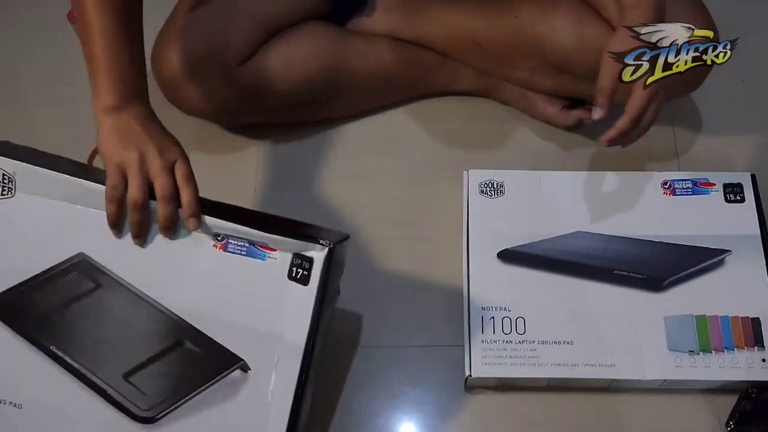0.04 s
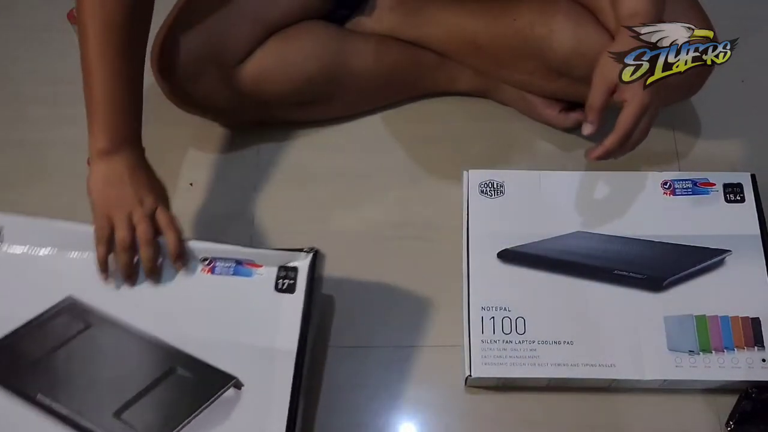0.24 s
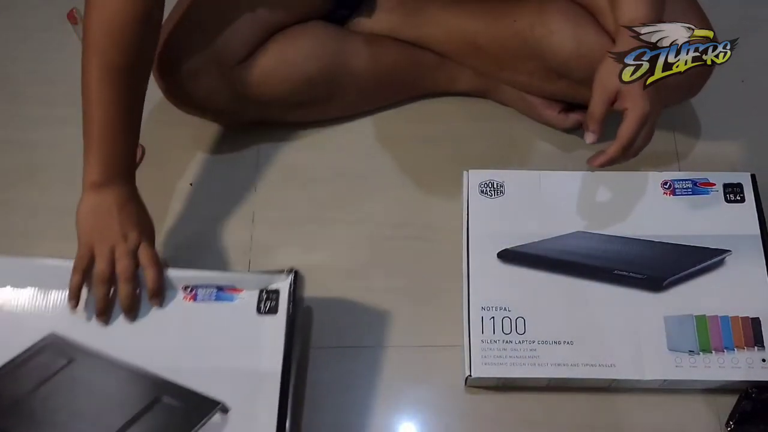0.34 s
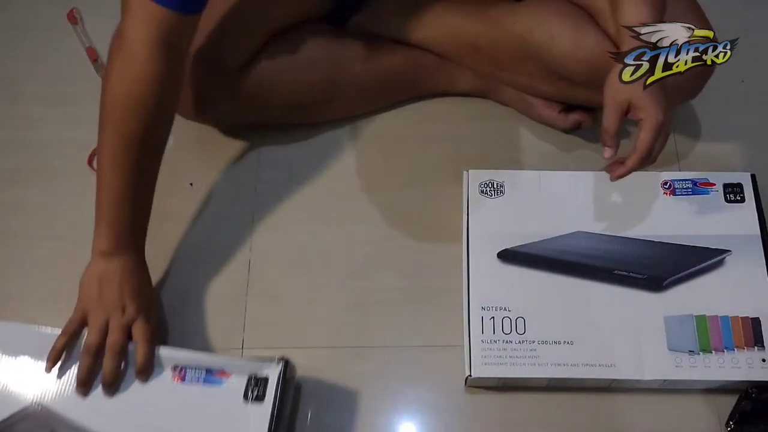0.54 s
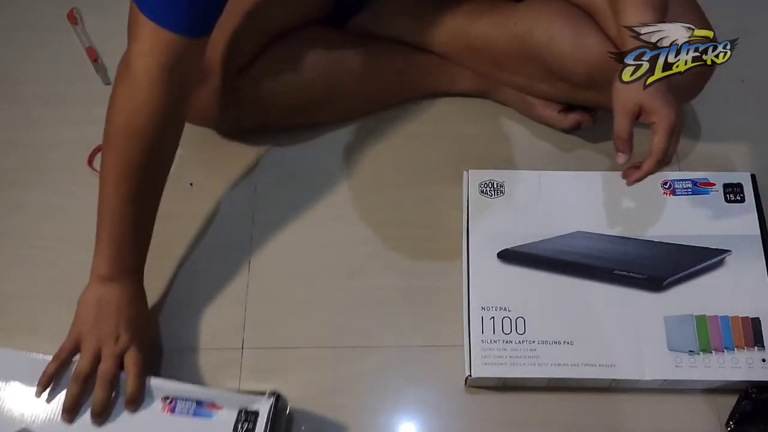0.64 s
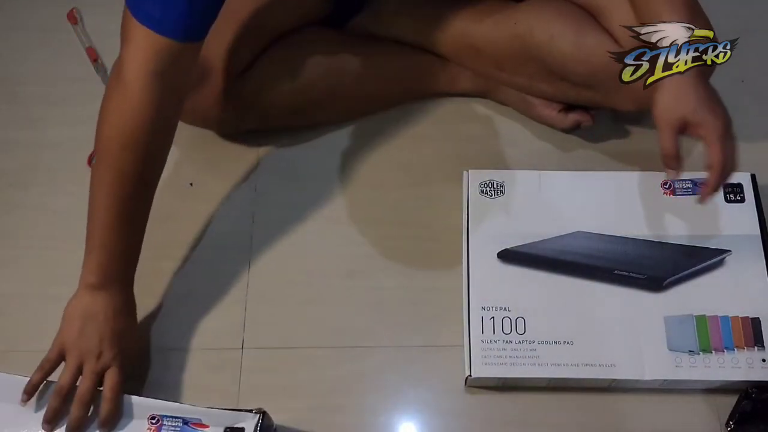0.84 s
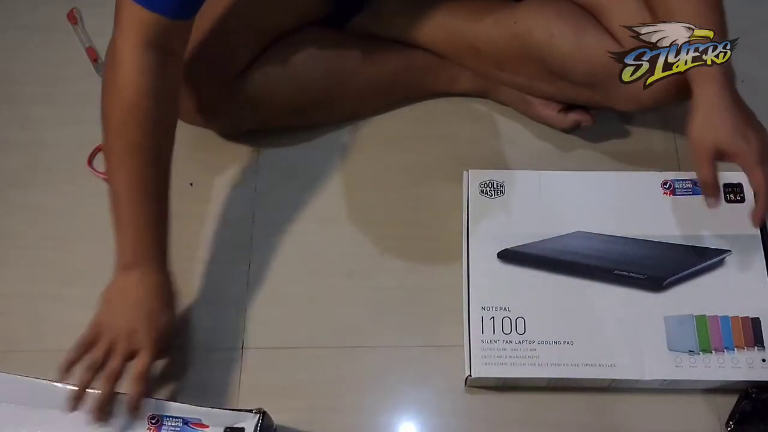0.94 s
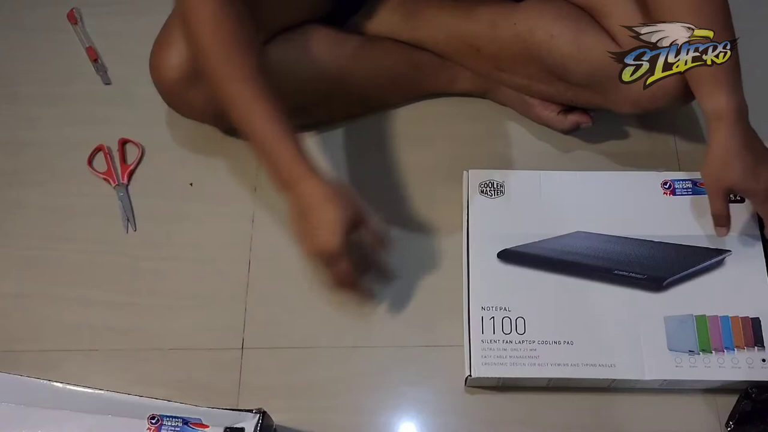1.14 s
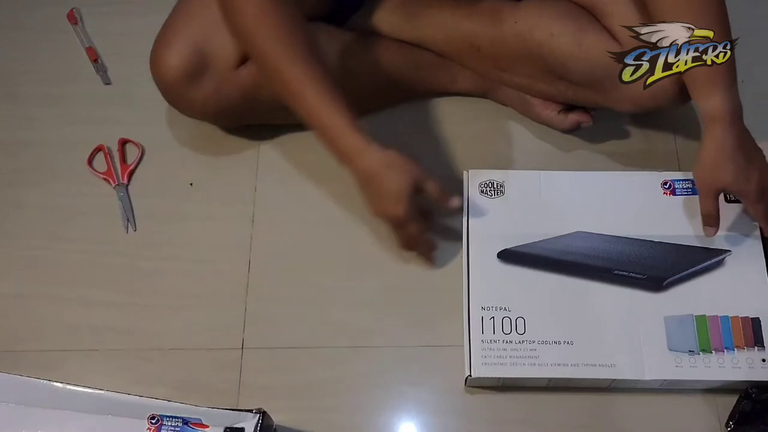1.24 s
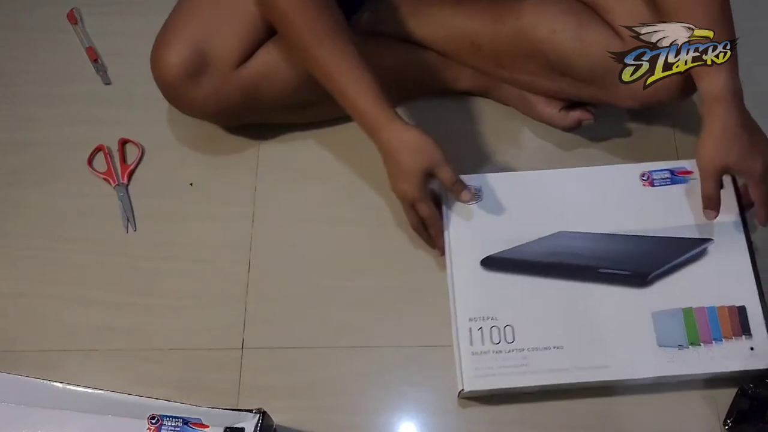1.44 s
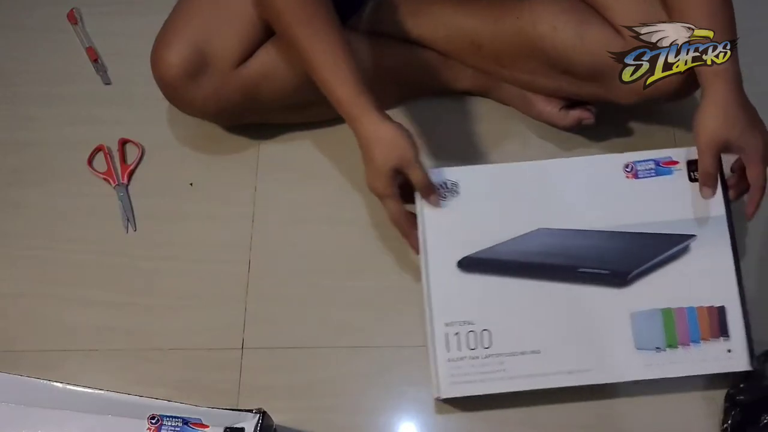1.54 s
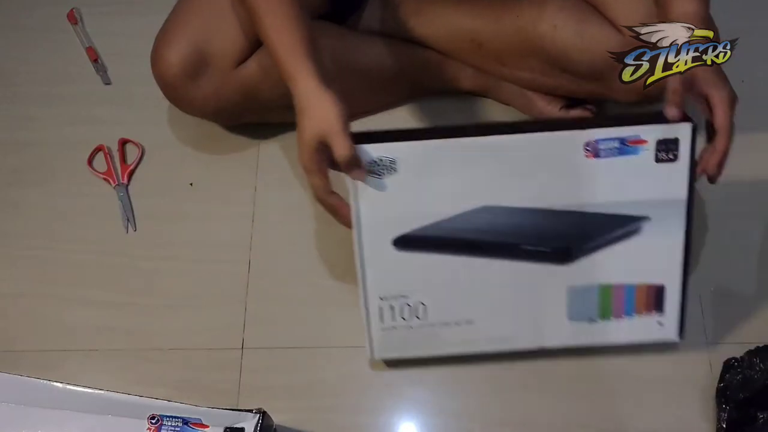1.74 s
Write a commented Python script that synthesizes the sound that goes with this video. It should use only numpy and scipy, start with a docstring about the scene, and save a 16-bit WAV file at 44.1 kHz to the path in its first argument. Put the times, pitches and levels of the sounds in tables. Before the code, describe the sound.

A cardboard box is shoved aside with quick hollow knocks, lands with a loud juddering scrape and slides over tiles with a soft hiss. A hand slap and faint taps follow, close by in a small hard room.

```python
"""A small hard room with a tiled floor: a cardboard box is shoved aside, knocks, drops flat, judders and
slides away with a soft hiss. A hand lets go of it with a slap, then taps and lifts a second box.
Each knock is a ringing panel over a crunch of corrugated board; edges tick and pushed-out air thumps.
Stick-slip friction shakes the box into a scrape, a palm rubs the lid and glossy card squeaks faintly.
The room answers with two near echoes and a short tail, over a quiet, steady background."""
import sys
import numpy as np
from scipy import signal
from scipy.fft import rfft, irfft
from scipy.io import wavfile
from scipy.ndimage import uniform_filter1d, minimum_filter1d

SR = 44100
rng = np.random.default_rng(int(sys.argv[2]) if len(sys.argv) > 2 else 0)


def put_to_file(sound):
    """Save the sound as 16-bit audio at rate SR, in the file named by the first command-line argument."""
    columns = np.atleast_2d(sound).T  # one column per channel
    safe = np.clip(columns, -1, 1)
    whole_steps = np.round(safe * 32767)
    wavfile.write(sys.argv[1], SR, whole_steps.astype(np.int16))


N = 79380
HIT_SAMPLES, FLEX_S = SR // 4, 0.0012  # length of one hit; attack of a flexing panel


def amp(db):
    """Decibels to linear gain."""
    return 10 ** (np.asarray(db) / 20)


def unit_rms(x):
    """Scales x to rms 1."""
    return x / np.sqrt(np.mean(x ** 2) + 1e-20)


def value_at(points, hz):
    """Reads a curve along a log-frequency axis."""
    freqs, values = np.transpose(points)
    return np.interp(np.log(hz + 1), np.log(freqs + 1), values)


def fader(curve):
    """Gain over the whole scene from (time [s], level [dB]) points."""
    return amp(np.interp(np.arange(N) / SR, *np.transpose(curve)))


def add(mix, start_s, sound):
    """Mixes a sound in at its start time."""
    part = mix[max(round(start_s * SR), 0):][:len(sound)]
    part += sound[:len(part)]


def shaped(x, gains):
    """Applies one gain per spectral bin."""
    return irfft(rfft(x) * gains, len(x))


def coloured(x, colour):
    """Equalises x with (frequency [Hz], gain [dB]) points, at rms 1."""
    hz = np.fft.rfftfreq(len(x), 1 / SR)
    return unit_rms(shaped(x, amp(value_at(colour, hz))))


def octaves_from(hz, size):
    """Distance of each spectral bin from hz."""
    return abs(np.log2((np.fft.rfftfreq(size, 1 / SR) + 1) / hz))


def decay(t, t60):
    """Envelope that falls 60 dB in t60 seconds."""
    return np.exp(-np.log(1000) * t / t60)


def friction(catches_per_s, spread_db, catch_share):
    """Separate catches of uneven size over an even rub."""
    sizes = amp(spread_db * np.minimum(rng.exponential(1, N), 4)) * rng.choice([-1, 1], N)
    catches = unit_rms(sizes * (rng.random(N) < catches_per_s / SR))
    return catch_share * catches + (1 - catch_share) * rng.standard_normal(N)


def slide():
    """Card glides over tile and skin: a grainy murmur of the box, a fine hiss and a fizz on top."""
    # swell of each friction layer (time [s], level [dB])
    murmur_level = [(0, -42), (0.12, -41.5), (0.35, -38.5), (0.6, -43.5), (0.78, -44), (0.95, -45.5),
                    (1.05, -50.5), (1.13, -44), (1.2, -43.5), (1.3, -99), (1.45, -57.5), (1.56, -52),
                    (1.67, -49), (1.8, -45.5)]
    hiss_level = [(0, -70), (0.078, -45.5), (0.18, -61), (0.33, -69), (0.42, -32), (0.52, -47.5),
                  (0.7, -53.5), (0.851, -72), (1.0, -51), (1.11, -51.5), (1.17, -44), (1.27, -54.5),
                  (1.47, -60), (1.57, -55.5), (1.672, -55), (1.73, -45), (1.8, -54)]
    fizz_level = [(0.5, -78), (0.68, -54), (0.85, -42), (1.02, -49), (1.15, -57), (1.35, -55.5), (1.5, -82)]
    # tone of each friction layer (frequency [Hz], gain [dB])
    murmur_eq = [(40, -11), (120, -11.5), (190, -7), (280, 6), (500, -1), (800, 1), (1200, 2), (1700, -3.5),
                 (2700, -8.5), (4000, -18), (16000, -20)]
    hiss_eq = [(1000, 2.5), (3000, -1.5), (7000, -2.5), (11000, -3.5), (15500, 2)]
    fizz_eq = [(5000, -19), (10000, -10), (13000, -6), (15300, 0.5)]
    out = np.zeros(N)
    for eq, level in [(murmur_eq, murmur_level), (hiss_eq, hiss_level), (fizz_eq, fizz_level)]:
        grains = friction(catches_per_s=1500, spread_db=3.5, catch_share=0.36)
        out += coloured(grains, eq) * fader(level)
    return out


def panel_ring(pitch_hz, tilt_db):
    """A struck panel flexes and rings briefly; it radiates little far below its pitch."""
    # modes of a box panel (multiple of its pitch, level [dB], t60 [s])
    modes = [(1, 1, 0.066), (1.47, -14.5, 0.09), (2.02, 3, 0.045), (2.9, -6.5, 0.037), (4.1, -17.5, 0.028)]
    t = np.arange(HIT_SAMPLES) / SR
    gains = np.array([amp(db + tilt_db * np.log2(ratio)) for ratio, db, _ in modes])
    ring = sum(gain * decay(t, t60) * np.sin(2 * np.pi * ratio * pitch_hz * t)
               for gain, (ratio, _, t60) in zip(gains, modes))
    attack = 1 - np.exp(-(t / FLEX_S) ** 2)
    low_cut = signal.butter(2, 0.44 * pitch_hz, "highpass", fs=SR, output="sos")
    return signal.sosfilt(low_cut, ring * attack / np.linalg.norm(gains))


def board_crunch(corner_hz, t60, attack_s=0.00094, rolloff_order=3.86):
    """Corrugated board crunches under a blow: a noise burst, dulled above its corner."""
    # tone of crunching board (frequency [Hz], gain [dB])
    board_eq = [(30, -41), (100, -32), (200, -9), (255, 0), (700, 0.5), (1300, -4.5), (2200, -4.5),
                (4000, -11), (8000, -10), (16000, -24)]
    t, hz = np.arange(HIT_SAMPLES) / SR, np.fft.rfftfreq(HIT_SAMPLES, 1 / SR)
    high_cut = 1 / np.hypot(1, (hz / corner_hz) ** rolloff_order)
    noise = shaped(rng.standard_normal(HIT_SAMPLES), high_cut)
    return coloured(noise, board_eq) * decay(t, t60) * (1 - np.exp(-t / attack_s))


def knocks():
    """Each blow on the cardboard rings a panel and crunches the board at once."""
    # blows on the boxes (time [s], ring level [dB], panel pitch [Hz], mode tilt [dB/octave],
    # crunch level [dB], crunch corner [Hz], crunch t60 [s])
    blows = [(0.0377, -22.5, 1032, 3.5, -32, 3000, .05), (0.076, -34, 413, 19, -31.5, 1700, 0.11),
             (0.1468, -14.5, 359.4, 5, -25, 940, 0.11), (0.2108, -3.5, 339, 2.5, -32.5, 885, 0.063),
             (0.228, -13.5, 252, 7, -20.5, 804, 0.082), (0.245, -36, 424, 8, -23, 1790, 0.23),
             (0.268, -8.5, 465.6, 7.5, -21.5, 2550, 0.11), (0.3109, -10, 518, 15, -15.5, 2780, 0.054),
             (0.319, -6.5, 507, -7, -17, 1360, 0.18), (0.3742, -1, 240.2, 7, -6, 1100, 0.032),
             (0.388, -4.5, 410, -17, -8.5, 1210, 0.035), (0.409, 7.5, 336, 6.5, 3, 2370, 0.029),
             (0.4289, -10, 420, 14, -8, 1440, 0.12), (0.480, -7, 274, 6, -12, 1700, 0.051),
             (0.536, -16.5, 331, 5.5, -25, 900, 0.067), (1.152, -15.5, 409, 3, -35, 1400, 0.062),
             (1.1677, -10, 395.3, -2.5, -15, 1950, 0.087), (1.524, -26, 292, -5, -34, 810, 0.12),
             (1.576, -37, 472, -14, -34, 1500, 0.035), (1.702, -15, 355, -15, -35, 2800, 0.11),
             (1.717, -25.5, 341, 7, -40.5, 2040, 0.17)]
    out = np.zeros(N)
    for start_s, ring_db, pitch_hz, tilt_db, crunch_db, corner_hz, t60 in blows:
        add(out, start_s, amp(ring_db) * panel_ring(pitch_hz, tilt_db))
        add(out, start_s, amp(crunch_db) * board_crunch(corner_hz, t60))
    return out


def ticks(fall_db_per_octave=10):
    """Edges and nails click: snaps of noise that fall away either side of their brightest frequency."""
    # sharp contacts (time [s], level [dB], t60 [s], brightest frequency [Hz])
    contacts = [(0.0378, -24.5, 0.011, 9300), (0.2133, -34, 0.026, 3150), (0.356, -38, .03, 11250),
                (0.3746, -35.5, 0.24, 9600), (0.409, -10, 0.013, 3480), (0.481, -36.5, 0.035, 4900),
                (0.6, -31, 0.014, 10800), (1.1668, -30, 0.026, 10300), (1.171, -32.5, 0.029, 4960),
                (1.522, -45, 0.032, 2880), (1.72, -35.5, 0.0067, 8200)]
    out, t = np.zeros(N), np.arange(HIT_SAMPLES) / SR
    for start_s, db, t60, hz in contacts:
        peak = amp(-fall_db_per_octave * octaves_from(hz, HIT_SAMPLES))
        snap = unit_rms(shaped(rng.standard_normal(HIT_SAMPLES), peak))
        add(out, start_s, amp(db) * snap * decay(t, t60))
    return out


def scrape(low_hz=170, high_hz=3500):
    """The box edge sticks and slips on the tiles and shakes the whole box."""
    # force of the judder (time [s], level [dB])
    force = [(0.31, -52), (0.34, -48), (0.37, -16.5), (0.405, -29), (0.416, 1), (0.445, -15),
             (0.468, -18.5), (0.5, -29), (0.56, -35), (0.62, -42.5)]
    # resonances of the whole box (frequency [Hz], bandwidth [Hz], level [dB])
    resonances = [(255, 27, -7.5), (429, 67, -6.5), (642, 20.4, -5.5), (779, 48, -6), (1024, 210, -1.5),
                  (1354, 66, -7.5), (1519, 64, -4), (1650, 670, -10.5), (2480, 170, -15),
                  (3430, 1200, -16.5)]
    t, scene_t = np.arange(HIT_SAMPLES) / SR, np.arange(N) / SR
    touching = (scene_t > force[0][0]) & (scene_t < force[-1][0])
    slips = friction(catches_per_s=900, spread_db=4.5, catch_share=0.79) * fader(force) * touching
    body = np.zeros(HIT_SAMPLES)
    for k, (hz, width_hz, db) in enumerate(resonances):
        envelope = amp(db) * np.sqrt(width_hz) * np.exp(-np.pi * width_hz * t)
        body += (-1) ** k * envelope * np.sin(2 * np.pi * hz * t)  # modes alternate in polarity
    body = signal.sosfilt(signal.butter(2, (low_hz, high_hz), "bandpass", fs=SR, output="sos"), body)
    return signal.fftconvolve(slips, body / np.linalg.norm(body))[:N]


def thumps():
    """A box falling flat pushes out air in a low, quickly dying tone."""
    # puffs of air (time [s], level [dB], pitch [Hz], t60 [s])
    puffs = [(0.378, -29.5, 85, 0.25), (0.48, -30, 155, .08), (1.168, -26, 126.3, 0.15),
             (1.524, -37.5, 120, 0.068), (1.703, -41.5, 114, 0.14)]
    out, t = np.zeros(N), np.arange(HIT_SAMPLES) / SR
    attack = 1 - np.exp(-t / FLEX_S)
    for start_s, db, hz, t60 in puffs:
        add(out, start_s, amp(db) * np.sin(2 * np.pi * hz * t) * decay(t, t60) * attack)
    return out


def palm_rubs(width_octaves=0.33):
    """A palm pushes on the lid: dull swells of narrow-band noise."""
    # soft pushes (time [s], length [s], level [dB], band centre [Hz])
    pushes = [(0.621, 0.06, -34.5, 330), (1.081, 0.053, -39.5, 360), (1.118, 0.036, -37, 760)]
    out = np.zeros(N)
    for start_s, length_s, db, hz in pushes:
        size = int(length_s * SR)
        band = np.exp(-(octaves_from(hz, size) / width_octaves) ** 2 / 2)
        rub = unit_rms(shaped(rng.standard_normal(size), band))
        add(out, start_s, amp(db) * rub * np.sqrt(np.hanning(size)))
    return out


def squeaks(waver_depth=0.033, waver_cutoff_hz=149):
    """Glossy card sings on the tile with a wavering pitch where its slipping turns regular."""
    # faint squeaks (time [s], length [s], level [dB], start pitch [Hz], end pitch [Hz])
    glides = [(0.7, 0.073, -41.5, 1388, 1402), (0.762, 0.089, -42, 1077, 1185),
              (0.911, 0.092, -47, 797, 781)]
    out, smoothing = np.zeros(N), signal.butter(2, waver_cutoff_hz, fs=SR)
    for start_s, length_s, db, start_hz, end_hz in glides:
        size = int(length_s * SR)
        waver = unit_rms(signal.lfilter(*smoothing, rng.standard_normal(size)))
        pitch_hz = np.linspace(start_hz, end_hz, size) * (1 + waver_depth * waver)
        tone = np.sin(2 * np.pi * np.cumsum(pitch_hz) / SR)
        add(out, start_s, amp(db) * tone * np.sqrt(np.hanning(size)))
    return out


def room_tail(build_s=0.012):
    """A diffuse reverb tail whose treble dies first."""
    # decay of the room (frequency [Hz], t60 [s])
    reverb_times = [(100, 0.3), (300, 0.3), (1000, 0.35), (3000, 0.31), (8000, 0.2), (16000, 0.21)]
    hz, t, spectra = signal.stft(rng.standard_normal(SR), SR, nperseg=256)
    tail = signal.istft(spectra * decay(t, value_at(reverb_times, hz)[:, None]), SR, nperseg=256)[1]
    tail *= 1 - np.exp(-(np.arange(len(tail)) / SR / build_s) ** 2)
    return tail / np.linalg.norm(tail)


def room(x, tail_count=3, wet_db=-11.5, crossfade_s=0.035):
    """Two near echoes, then a short reverb, crossfaded among noise tails so that no one pitch rings."""
    # reflections off the floor and a nearby body (delay [s], level [dB])
    echoes = [(.0062, -22.5), (0.0205, -26)]
    out, turn = x.copy(), np.arange(N) / SR / crossfade_s
    for k in range(tail_count):
        send = np.sqrt(2 / tail_count) * np.cos(np.pi * (turn + k / tail_count))
        out += amp(wet_db) * signal.fftconvolve(x * send, room_tail())[:N]
    for delay_s, db in echoes:
        add(out, delay_s, amp(db) * x)
    return out


def room_tone(level_db=-56):
    """A quiet, steady bed of dark noise."""
    # tone of the background (frequency [Hz], gain [dB])
    background_eq = [(18, -68), (30, -32), (145, -4), (415, -6), (499, -10.5), (616, 3), (684, -9),
                     (1390, -12), (14800, -42.5), (16000, -50)]
    return amp(level_db) * coloured(rng.standard_normal(N), background_eq)


def scene():
    """All the box sounds play into the room, over its background, in mono."""
    boxes = knocks() + ticks() + scrape() + thumps() + palm_rubs() + squeaks() + slide()
    return (room(boxes) + room_tone())[None]


def record(dry, low_cut_hz=48, ceiling=0.94, hold_s=0.0094, high_cut_hz=15700):
    """The microphone loses deep bass, a limiter holds the loudest peaks and the top treble is cut."""
    x = signal.sosfilt(signal.butter(4, low_cut_hz, "highpass", fs=SR, output="sos"), dry)
    hold = int(hold_s * SR)
    needed_gain = ceiling / np.maximum(abs(x), ceiling)
    smooth_gain = uniform_filter1d(minimum_filter1d(needed_gain, hold), hold)
    high_cut = signal.firwin(1023, high_cut_hz, window=("kaiser", 8), fs=SR)
    return signal.oaconvolve(x * smooth_gain, high_cut[None], "same")


dry = scene()
out = record(dry)
put_to_file(out)
```